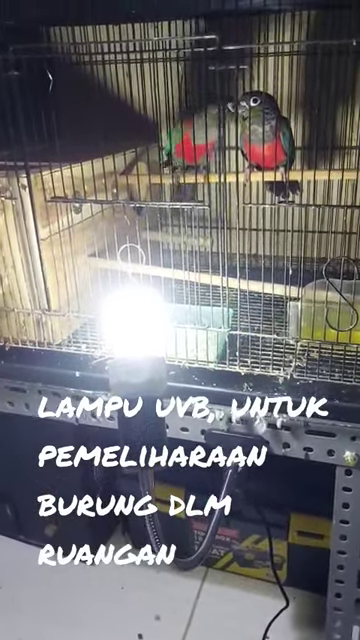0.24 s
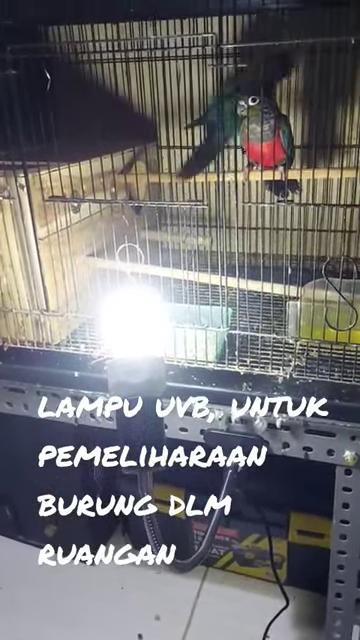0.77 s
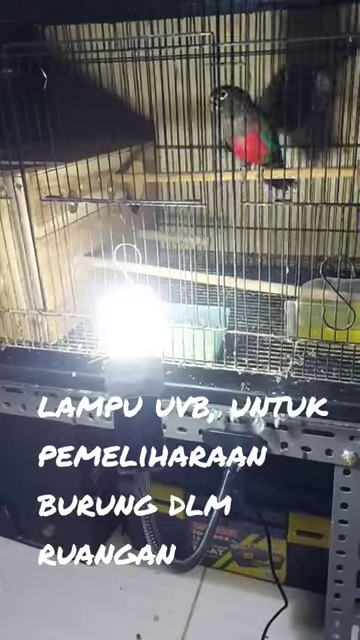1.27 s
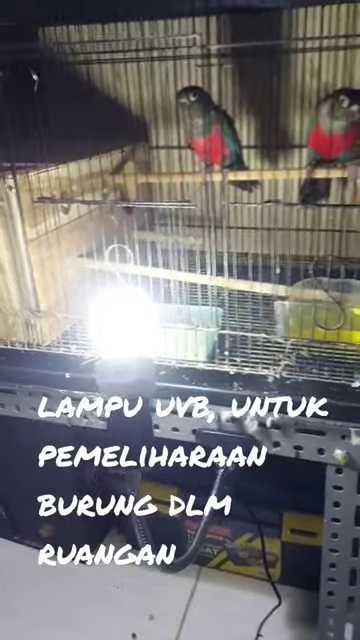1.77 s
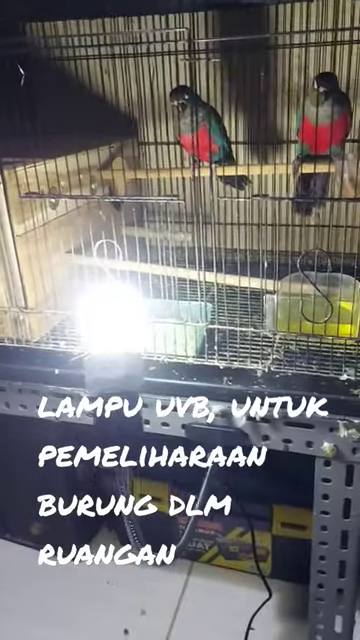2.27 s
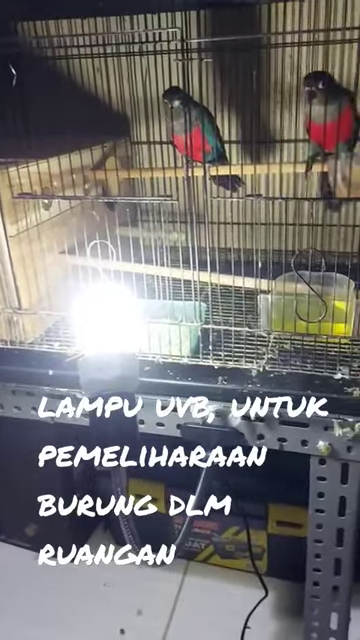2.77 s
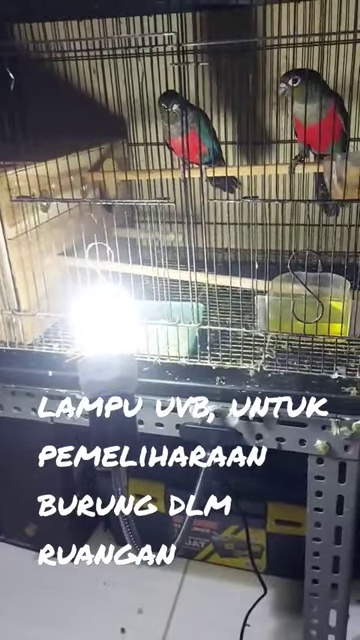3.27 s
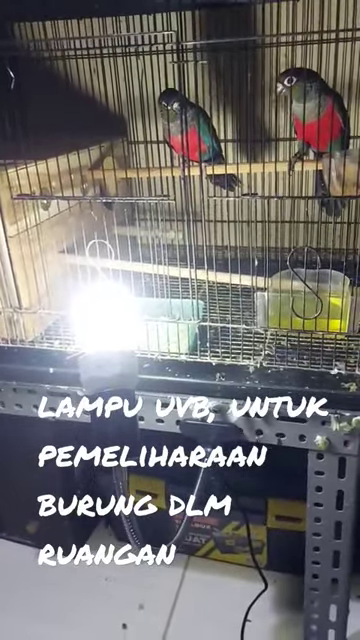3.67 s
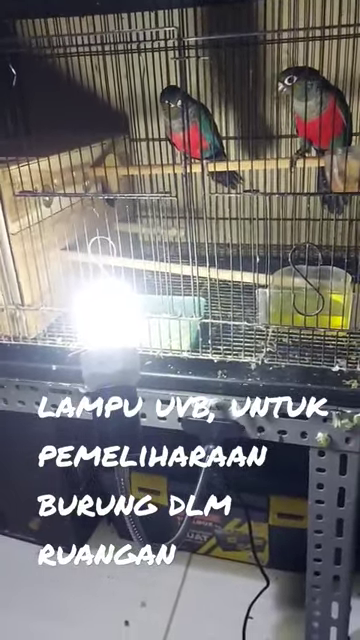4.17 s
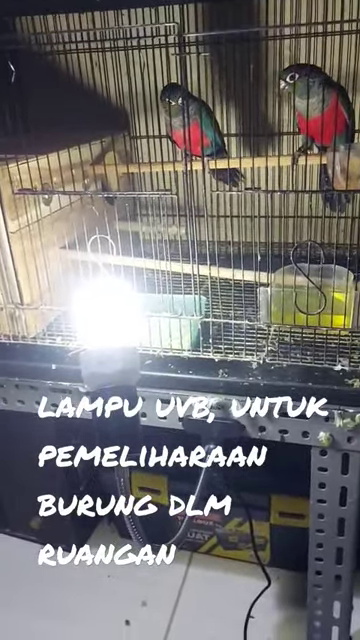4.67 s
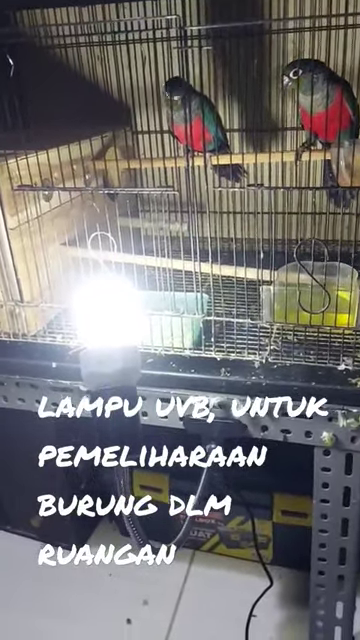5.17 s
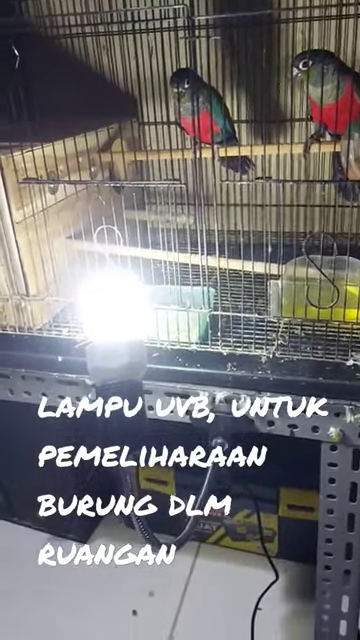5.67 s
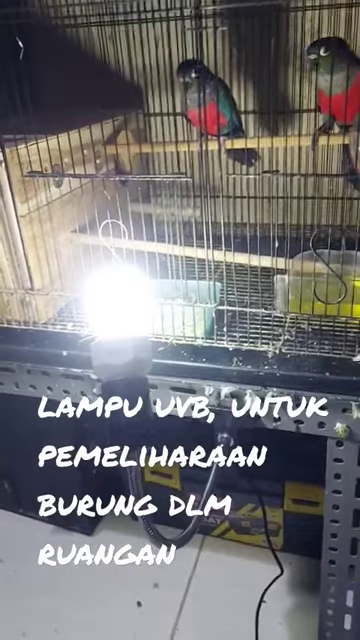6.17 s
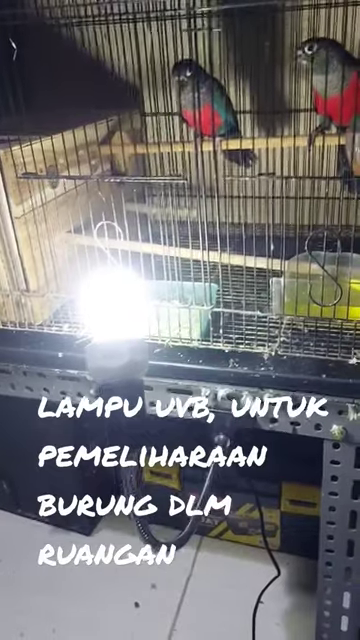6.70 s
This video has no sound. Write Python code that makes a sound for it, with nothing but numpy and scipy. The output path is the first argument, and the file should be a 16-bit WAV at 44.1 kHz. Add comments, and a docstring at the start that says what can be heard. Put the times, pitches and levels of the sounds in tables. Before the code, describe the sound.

Two small parrots squabble in a wire cage in a hard-walled room. Piercing screeches that break and plunge overlap nasal wails in the first three seconds. A perch knocks, rattling rasps follow, then a quieter stretch of faint whistles before a last cluster of rasps, screeches and a long wail. Faint hum and low rumble lie beneath; the microphone is fairly close, with a short bright room tail.

```python
"""A hard-walled room with a wire cage, where two small parrots squabble over a faint hum and rumble.
Screeches break and plunge; nasal wails, moans, whistles, thin whines and rattling rasps often overlap.
Each voice is a membrane's overtones and gusts of air, coloured by the throat; hisses are air alone.
A landing makes the wooden perch ring and claws tick on the wires, as bursts of fading noise.
Calls and cage noises reach the microphone direct, off the near walls and in the room's ringing tail."""
import sys
import numpy as np
from scipy import signal
from scipy.fft import rfft, irfft, next_fast_len
from scipy.io import wavfile
from scipy.ndimage import uniform_filter1d, map_coordinates

SR = 44100
rng = np.random.default_rng(int(sys.argv[2]) if len(sys.argv) > 2 else 0)


def master_out(mix):
    """Clip the mix to full scale and print it as 16-bit PCM to the path in sys.argv[1]."""
    frames = np.transpose(np.atleast_2d(mix))
    ceiling = np.clip(frames, -1, 1)
    pcm = np.round(ceiling * 32767).astype(np.int16)
    wavfile.write(sys.argv[1], SR, pcm)


N = 306054
TOP_HZ = 15650  # band limit at the microphone
TILT_FROM_HZ = 3000  # brightness tilts noise only above this
SWELL_DB, FADE_DB = 12, 10.5  # how far below its full level a call usually starts, and ends

# Throat resonances of wails and moans: [f/Hz, level/dB]
WAIL_THROAT = [(100, -51), (450, -46.5), (760, 3), (1100, -20.5), (1500, -9), (2300, -5), (3100, 0.5),
               (3700, -2), (4250, 4.5), (5000, -11.5), (6400, -5), (8200, -3), (9500, -22), (12000, -14.5),
               (15500, -31)]
# Colour of open-beak air, also of the perch's crack: [f/Hz, level/dB]
HISS_THROAT = [(100, -46), (500, -5.5), (1000, -8.5), (1500, 5.5), (2500, -3.5), (3400, -2.5), (4100, 7),
               (5000, -9), (7500, -9.5), (10000, -19), (15000, -28.5)]


def amp(db):
    """Decibels to gain."""
    return 10 ** (np.asarray(db) / 20)


def unit(x):
    """Scale to rms 1."""
    return x / np.sqrt(np.mean(x ** 2) + 1e-20)


def along(points, hz):
    """Read (f/Hz, value) points on a log frequency axis."""
    f, v = np.transpose(points)
    return np.interp(np.log(hz + 1), np.log(f + 1), v)


def add(track, s, x):
    """Mix x into the track at time s."""
    start = max(round(s * SR), 0)
    part = track[start:start + len(x)]
    part += x[:len(part)]


def wobble(rate, n):
    """A smooth random curve, rate knots a second."""
    knots = rng.standard_normal(int(n * rate / SR) + 4)
    return map_coordinates(knots, [np.arange(n) * rate / SR])


def filtered(x, response):
    """Multiply the spectrum of x by a response of frequency."""
    m = next_fast_len(len(x) + 8192)
    return irfft(rfft(x, m) * response(np.fft.rfftfreq(m, 1 / SR)), m)[:len(x)]


def noise(spectrum, n, tilt_db=0):
    """Coloured noise of rms 1, tilted by tilt_db an octave in the treble."""
    def colour(hz):
        return amp(along(spectrum, hz) + tilt_db * np.log2(np.maximum(hz, TILT_FROM_HZ)))
    return unit(filtered(rng.standard_normal(n), colour))


def syrinx(controls, throat, jitter, jitter_rate, breathy, flutter_db, odd_db=0):
    """A vibrating membrane heard through the throat; roughness shakes its pitch and lets air through."""
    uneven_db, break_speed = 3.5, 40  # overtone unevenness; pitch leap that is all noise, octaves/s
    pitch, db, rough, bright_db = controls
    n, rough = len(pitch), np.clip(rough, 0, 1)
    shake = jitter * rough * wobble(jitter_rate, n)
    shake = shake + (0.0028 + 0.02134 * rough) * wobble(130.16, n)
    phase = 2 * np.pi * np.cumsum(pitch * (1 + shake)) / SR
    k = np.arange(1, int(TOP_HZ / pitch.min()) + 1)[:, None]  # harmonic numbers
    # Tongue and beak favour shifting overtones.
    tongue_db = uneven_db * np.array([wobble(27.3, n) for _ in k])
    gains_db = along(throat, k * pitch) + bright_db * np.log2(k) + odd_db * (k % 2) + tongue_db
    gains = amp(gains_db) * (k * pitch < TOP_HZ)
    # Chaotic vibration widens the higher overtones into bands that still follow the pitch.
    chaos = np.array([wobble(350, n) for _ in k])
    blur = 1.7 * rough * np.minimum(k * pitch / 3500, 1) * chaos
    tone = np.sqrt(2) * (gains * np.sin(k * phase + blur)).sum(0) / np.linalg.norm(gains, axis=0)
    air = unit(noise(throat, n, bright_db) * (1 + .5 * np.cos(phase)))  # one gust a cycle
    # The voice cracks into noise where the pitch leaps.
    leap = np.gradient(np.log2(pitch)) * SR  # octaves/s
    air_share = np.clip(breathy * rough ** 2 + (leap / break_speed) ** 2, 0, 1)
    flutter = unit(amp(flutter_db * rough * wobble(420, n)))
    t = np.arange(n) / SR
    edges = (1 - np.exp(-t / .005)) * (1 - np.exp(-t[::-1] / .003))
    return amp(db) * edges * flutter * (np.sqrt(1 - air_share) * tone + np.sqrt(air_share) * air)


def swell(t, attack_s, release_s, depth_db=SWELL_DB):
    """Level in dB relative to the full voice: attack, hold, release."""
    rise = np.clip(1 - t / attack_s, 0, 1)
    fall = np.clip(1 - t[::-1] / release_s, 0, 1)
    return -depth_db * rise ** 2 - FADE_DB * fall ** 2


def arc(length_s, first_hz, middle_hz, last_hz, db, attack_s, release_s, rough, bright_db):
    """Controls of a call whose pitch bends smoothly through three points."""
    t = np.arange(0, length_s, 1 / SR)
    bend = np.polyfit([0, .5, 1], np.log2([first_hz, middle_hz, last_hz]), 2)
    pitch = 2 ** np.polyval(bend, t / length_s)
    return pitch, db + swell(t, attack_s, release_s), rough, bright_db


def calls(table, throat, jitter, jitter_rate, breathy, odd_db=0):
    """All calls of one kind that swell, hold and fade while the pitch draws one arc."""
    track = np.zeros(N)
    for s, *shape in table:
        voice = syrinx(arc(*shape), throat, jitter, jitter_rate, breathy, flutter_db=-2.5, odd_db=odd_db)
        add(track, s, voice)
    return track


def screeches():
    """A bark clears into a held note; the note sags, breaks to a lower register and plunges."""
    # Screeches: [t/s, bark length/s, note length/s, note f/Hz, f after the break/Hz,
    # bark level/dB, note level/dB, plunge level/dB, note brightness/dB per octave]
    screech_calls = [ (0.396, 0.027, .108, 3480, 2167, -21.5, -20, -20, 5.5),
                     (1.362, 0.041, 0.11, 3617, 2266, -25.5, -20.5, -24.5, -3),
                     (2.205, 0.039, .086, 3550, 2285, -21.5, -16, -21, 1),
                     (5.821, .03, .103, 3642, 2387, -25, -18.5, -18, 3.5),
                     (6.208, 0.031, 0.1, 3604, 2424, -22, -17, -21, 4.5)]
    # Throat resonances: [f/Hz, level/dB]
    throat = [(100, -55), (800, -43.5), (1500, -12), (2200, 5.5), (2900, 5.5), (3600, 0.5), (4600, 8.5),
              (5800, -10), (7300, -11), (9200, -15), (11000, -23.5), (14000, -34), (16000, -56)]
    bark_rough, note_rough, clearing_s = 0.841, 0.041, 0.014
    scoop_octaves, scoop_share = .55, .3  # upward swoop, and its decay as a share of the bark
    sag_octaves, sag_s, sag_db = 0.35, .015, 8.5  # pitch and level sag just before the break
    plunge_s, plunge_octaves_per_s, plunge_rough, plunge_bright_db = 0.071, 9.5, 0.35, 5

    def voice(*controls):
        return syrinx(controls, throat, jitter=0.066, jitter_rate=800, breathy=0.25, flutter_db=1.0)

    track = np.zeros(N)
    for s, bark_s, note_s, note_hz, break_hz, bark_db, note_db, plunge_db, bright_db in screech_calls:
        t = np.arange(0, bark_s + note_s, 1 / SR)
        clear = np.clip((t - bark_s) / clearing_s + .5, 0, 1)  # 0 in the bark, 1 in the note
        sag = np.exp(-t[::-1] / sag_s)
        scoop = np.exp(-t / (scoop_share * bark_s))
        pitch = note_hz * 2 ** (-scoop_octaves * scoop - sag_octaves * sag)
        db = bark_db + (note_db - bark_db) * clear - sag_db * sag
        db = db + swell(t, attack_s=.7 * bark_s, release_s=0.0018)
        rough = bark_rough + (note_rough - bark_rough) * clear
        add(track, s, voice(pitch, db, rough, bright_db))

        t = np.arange(0, plunge_s, 1 / SR)
        pitch = break_hz * 2 ** (-plunge_octaves_per_s * t)
        db = plunge_db + swell(t, attack_s=.004, release_s=0.06)
        add(track, s + bark_s + note_s, voice(pitch, db, plunge_rough, plunge_bright_db))
    return track


def wails():
    """Low nasal calls scoop up and glide; where odd harmonics are weak they sound an octave higher."""
    # Wails: [t/s, length/s, first f/Hz, last f/Hz, scoop/octaves, level/dB, attack/s, release/s,
    # roughness 0-1, brightness/dB per octave, odd-harmonic level/dB]
    wail_calls = [ (0.509, .23, 691.4, 765.5, .02, -21.5, .11, 0.087, 0.29, 1, -5.5),
                  (2.226, 0.29, 672, 774, 0.09, -21, 0.16, 0.081, 0.21, 1, -9.5),
                  (4.315, 0.27, 686, 763, 0.018, -46, 0.033, 0.05, .4, -1, 1),
                  (5.018, .15, 731, 671, .01, -50.5, 0.064, .04, 0.4, -6, 5),
                  (5.71, 0.13, 666, 618, 0.0059, -34.5, 0.077, 0.0044, 0.3, -13.5, -13),
                  (5.764, .41, 776.2, 825.6, .4, -23.5, 0.082, 0.11, .16, 1.5, -1.5)]
    scoop_s, swell_db = 0.032, 20  # how fast the scoop ends; starting depth below full level
    track = np.zeros(N)
    for (s, length_s, first_hz, last_hz, scoop, db, attack_s, release_s,
         rough, bright_db, odd_db) in wail_calls:
        t = np.arange(0, length_s, 1 / SR)
        pitch = np.linspace(first_hz, last_hz, len(t)) * 2 ** (-scoop * np.exp(-t / scoop_s))
        controls = pitch, db + swell(t, attack_s, release_s, swell_db), rough, bright_db
        voice = syrinx(controls, WAIL_THROAT, jitter=0.04, jitter_rate=600, breathy=0.66,
                       flutter_db=1.5, odd_db=odd_db)
        add(track, s, voice)
    return track


def moans():
    """Slides down from the end of a wail, through the same throat, with weak odd harmonics."""
    # Moans: [t/s, length/s, first f/Hz, middle f/Hz, last f/Hz, level/dB, attack/s, release/s,
    # roughness 0-1, brightness/dB per octave]
    moan_calls = [ (.69, .075, 1423, 1141, 958, -28, 0.025, 0.016, .55, -3.5),
                  (2.49, .22, 1444, 1187, 892, -27, .03, 0.32, .42, -9.5)]
    return calls(moan_calls, WAIL_THROAT, jitter=0.077, jitter_rate=660, breathy=0.16, odd_db=-11)


def whistles():
    """High calls whose few overtones fit below the band limit."""
    # Whistles: [t/s, length/s, first f/Hz, middle f/Hz, last f/Hz, level/dB, attack/s, release/s,
    # roughness (held to 1), brightness/dB per octave]
    whistle_calls = [ (0, 0.043, 3393, 3120, 2830, -21, 0.00067, 0.056, 1.11, 3.5),
                     (.03, 0.12, 3050, 2834, 2450, -41.5, .005, 0.038, .7, -13),
                     (.655, .145, 2632, 2861, 2801, -17.5, 0.0093, 0.012, .08, 5.5),
                     (2.445, 0.11, 2738, 2943, 2969, -16, 0.035, 0.024, .07, 4.5),
                     (4.245, .115, 2610, 2690, 2780, -48, 0.15, .02, 0.25, -12),
                     (4.52, .25, 3215, 2912, 2740, -37, 0.11, 0.11, .25, -4),
                     (4.67, .13, 2800, 2646, 2557, -46, 0.028, 0.11, 0.16, -7),
                     (5.13, 0.097, 2306, 2130, 1954, -40, 0.078, 0.014, 0.5, 7),
                     (5.39, 0.074, 4220, 4620, 4800, -19, 0.023, 0.02, 1.1, 1),
                     (5.6, 0.18, 2040, 2290, 2390, -43, 0.033, 0.0091, .2, 8.5),
                     (6.075, 0.052, 2106, 1940, 1858, -27, 0.0091, 0.0066, 0.3, 14),
                     (6.115, 0.085, 2168, 2408, 1920, -26.5, 0.0057, 0.045, 0.52, 11.5)]
    # Throat resonances: [f/Hz, level/dB]
    throat = [(100, -56), (800, -37), (1500, 3.5), (2200, 8), (2900, -1), (3600, -6.5), (4600, -3),
              (5900, -7), (7300, -16.5), (8800, -25.5), (11500, -28.5), (14000, -33), (16000, -52)]
    return calls(whistle_calls, throat, jitter=.06, jitter_rate=800, breathy=0.086)


def whines():
    """Thin calls from a throat that dulls the treble."""
    # Whines: [t/s, length/s, first f/Hz, middle f/Hz, last f/Hz, level/dB, attack/s, release/s,
    # roughness 0-1, brightness/dB per octave]
    whine_calls = [ (.155, .16, 1864, 1861, 1517, -27, 0.044, 0.18, 0.15, 0),
                   (.885, 0.16, 1500, 1735, 1438, -33.5, 0.12, 0.05, 0.23, 2),
                   (1.0, 0.17, 3610, 3520, 3370, -45.5, 0.056, 0.075, 0.29, -4)]
    # Throat resonances: [f/Hz, level/dB]
    throat = [(100, -36.5), (800, -12.5), (1500, 12), (2000, 5.5), (3600, -9), (5500, -26), (7300, -11.5),
              (9500, -20), (11500, -20.5), (15000, -41)]
    return calls(whine_calls, throat, jitter=0.064, jitter_rate=240, breathy=0.33)


def rasps(puff_fall_db=18, usual_rate=125, first_puff_s=.006):
    """The airway snaps open and shut: each puff starts sharply and fades until the next."""
    # Rasps: [t/s, length/s, first f/Hz, middle f/Hz, last f/Hz, level/dB, attack/s, release/s,
    # roughness 0-1, brightness/dB per octave, first puff rate/Hz, last puff rate/Hz]
    rasp_calls = [ (1.783, .2, 1078, 1081, 1219, -34.5, .002, 0.0036, 0.64, 4, 31.36, 107.6),
                  (1.975, 0.11, 2380, 2482, 2382, -21.5, 0.015, 0.19, 0.83, 6.5, 134.7, 163.5),
                  (3.456, 0.33, 870, 1045, 1064, -25, 0.18, 0.066, 0.59, 5.5, 128.6, 125.3),
                  (3.785, 0.13, 824.5, 844.4, 811, -25, 0.016, 0.14, 0.86, 1, 125.9, 134.8),
                  (5.185, .215, 1028, 1022, 1314, -18, 0.058, 0.0077, 0.687, 2.5, 119.5, 125.7),
                  (5.385, .115, 1750, 2240, 2667, -25, 0.013, 0.15, 0.54, 5, 116, 135.4)]
    # Throat resonances: [f/Hz, level/dB]
    throat = [(100, -44), (500, -66.5), (1000, -4), (1500, -4), (2050, 5.5), (2500, 0), (3200, 3),
              (4700, 3), (6300, -7.5), (7800, -1.5), (9300, -16.5), (11000, -12), (13000, -28),
              (15500, -43)]
    track = np.zeros(N)
    for s, *shape, first_rate, last_rate in rasp_calls:
        pitch, db, rough, bright_db = arc(*shape)
        progress = np.linspace(0, 1, len(pitch))
        rate = first_rate * (last_rate / first_rate) ** (progress ** 2)  # changes most near the end
        turns = np.cumsum(rate * (1 + .05 * wobble(60, len(rate)))) / SR
        cycle = (turns - rate[0] * first_puff_s) % 1  # place within a puff
        fall_db = puff_fall_db * usual_rate / rate  # slow puffs stand apart as ticks
        puffs = unit(uniform_filter1d(amp(-fall_db * cycle), size=44))  # edges softened over 1 ms
        sagging = pitch * (1 + .05 * (.25 - cycle))  # the pitch sags with the pressure in each puff
        controls = sagging, db, rough, bright_db
        voice = syrinx(controls, throat, jitter=.05, jitter_rate=800, breathy=.25, flutter_db=2.5)
        add(track, s, puffs * voice)
    return track


def hisses():
    """A parrot pushes air through its open beak without a tone."""
    # Soft hisses: [t/s, length/s, level/dB]
    breaths = [(0.098, 0.4, -41.5), (1.237, 0.2, -46.5), (1.611, 0.16, -45.5), (2.115, 0.3, -41),
               (6.536, 0.41, -46)]
    track = np.zeros(N)
    for s, length_s, db in breaths:
        n = round(length_s * SR)
        add(track, s, amp(db) * signal.windows.tukey(n, .45) * noise(HISS_THROAT, n))
    return track


def cage(knock_db=-7, crack_db=-8, tick_db=-10):
    """A landing bird sets the perch's modes ringing, with a crack of noise; claws tick on the wires."""
    # Landings on the perch: [t/s, level/dB before knock_db]
    landings = [(2.994, -26)]
    # Modes of the wooden perch: [f/Hz, level/dB, t60/s]
    perch_modes = [(352, -4, 0.54), (432, -4, 0.17), (617, -8, 0.11), (738, -10, 0.079), (822, -16.5, 0.05),
                   (850, 4, 0.061), (1530, -11, 0.091), (1670, -5.5, 0.044), (2520, -15, 0.043),
                   (4000, -9, 0.06)]
    # Claws on wire: [t/s, level/dB before tick_db]
    claw_ticks = [(3.079, -44), (3.1532, -45.5), (3.238, -38), (4.223, -37.5), (4.879, -42), (4.995, -42.5)]
    # Colour of a claw tick: [f/Hz, level/dB]
    claw_colour = [(1000, -63), (4000, -9), (8500, 2.5), (11000, 0), (15000, -2)]
    track, t = np.zeros(N), np.arange(SR // 3) / SR
    for s, db in landings:
        ring = sum(amp(level - 60 * t / t60) * np.sin(2 * np.pi * hz * t) for hz, level, t60 in perch_modes)
        crack = amp(crack_db - 60 * t / 0.046) * noise(HISS_THROAT, len(t))
        add(track, s, amp(db + knock_db) * (ring + crack))
    for s, db in claw_ticks:
        add(track, s, amp(db + tick_db - 60 * t / 0.071) * noise(claw_colour, len(t)))
    return track


def background(air_db=-61):
    """Hum tones with wandering phase, low rumble of drifting level and faint steady hiss."""
    # Hum tones: [f/Hz, level/dB]
    hum_tones = [(49, -73), (80, -62.5), (148, -68), (296, -70.5)]
    # Relative spectrum of the hiss: [f/Hz, level/dB per Hz]
    air_colour = [(20, -49), (34, -26), (50, -5), (80, -14), (190, -21), (350, -1), (600, -18), (1200, -11),
                  (2200, -12.5), (3200, -24), (7700, -19.5), (11000, -25.5), (15500, -33)]
    # Relative spectrum of the rumble: [f/Hz, level/dB per Hz]
    rumble_colour = [(20, -41.5), (35, -26), (50, -3), (75, -2), (114, -10), (147, -7.5), (190, -14),
                     (325, -5), (430, -15), (600, -19.5), (1200, -32), (4000, -40), (16000, -78)]
    # Drift of the rumble: [t/s, level/dB]
    rumble_drift = [(0.0, -53.5), (0.37, -53), (3.58, -58.5), (4.56, -45.5), (6.94, -54.5)]
    t = np.arange(N) / SR
    hum = np.zeros(N)
    for hz, db in hum_tones:
        hum += amp(db) * np.sqrt(2) * np.sin(2 * np.pi * hz * t + .6 * wobble(11.0, N))
    rumble = amp(np.interp(t, *np.transpose(rumble_drift))) * noise(rumble_colour, N)
    return hum + rumble + amp(air_db) * noise(air_colour, N)


def room(x, direct_db, early_db, tail_db):
    """Near walls answer within 30 ms, and the whole room rings on from 5 ms."""
    # Ringing time of the room: [f/Hz, t60/s]
    ring_times = [(200, 0.21), (800, 0.42), (3000, 0.53), (6000, 0.49), (11000, 0.41), (16000, 0.3)]
    hz, t, z = signal.stft(rng.standard_normal(SR), SR, nperseg=256)
    fading = z * amp(-60 * t / along(ring_times, hz)[:, None])
    tail = signal.istft(fading, SR, nperseg=256)[1]
    response = amp(tail_db) * np.pad(tail / np.linalg.norm(tail), (SR // 200, 0))
    walls = rng.integers(SR // 500, SR * 3 // 100, size=8)  # echo delays in samples
    response[walls] += amp(early_db) * rng.choice([-1, 1], size=8) / np.sqrt(len(walls))
    response[0] += amp(direct_db)
    return signal.fftconvolve(x, response)[:N]


def scene():
    """Both birds and their cage in the room, over the background."""
    shrill = room(screeches() + whistles() + whines(), direct_db=-1.0, early_db=-8, tail_db=-1.5)
    nasal = room(wails() + moans(), direct_db=2.0, early_db=-14.5, tail_db=-5.0)
    noisy = room(rasps() + hisses() + cage(), direct_db=-5.0, early_db=-11, tail_db=-3)
    return (shrill + nasal + noisy + background())[None]


def record(dry):
    """The microphone channel keeps nothing above the band limit."""
    return np.array([filtered(x, lambda hz: hz < TOP_HZ) for x in dry])


dry = scene()
out = record(dry)
master_out(out)
```